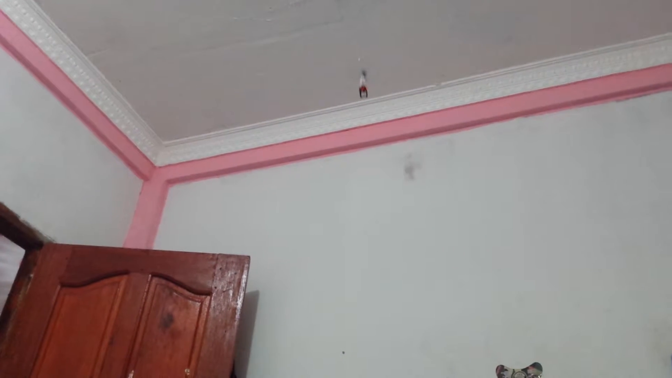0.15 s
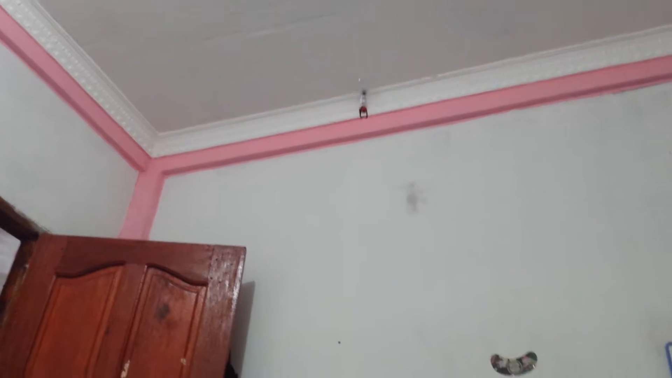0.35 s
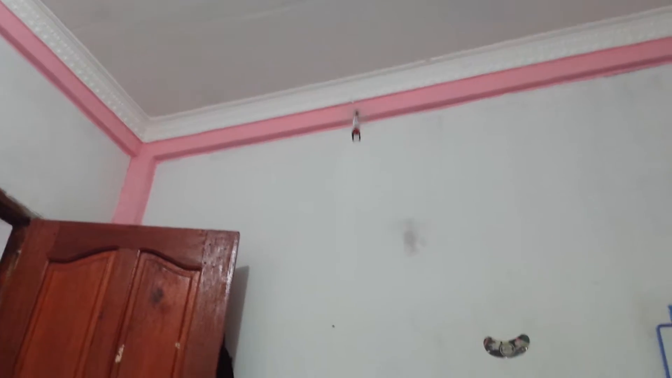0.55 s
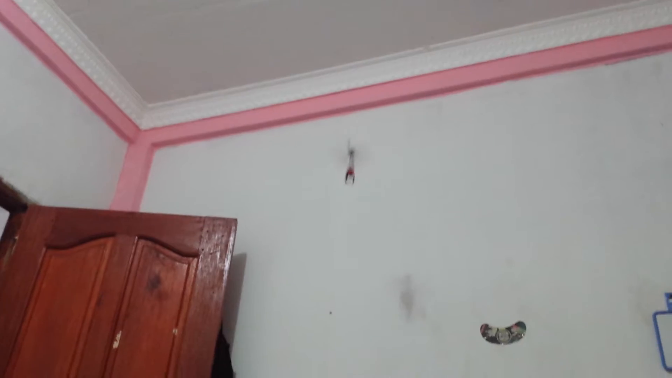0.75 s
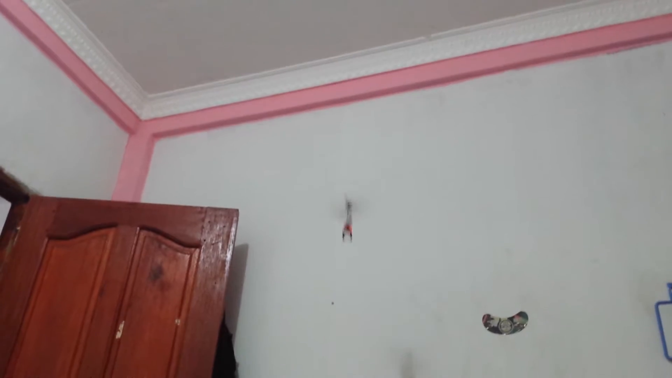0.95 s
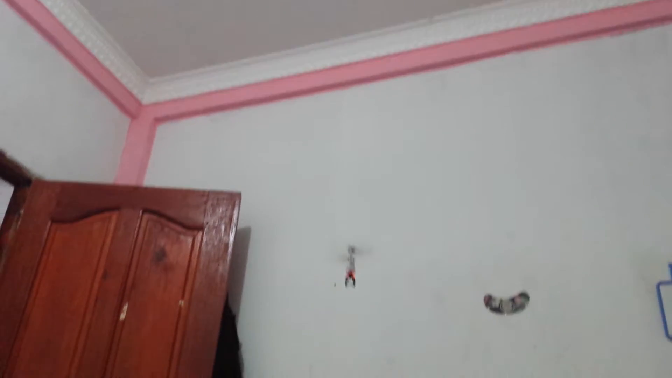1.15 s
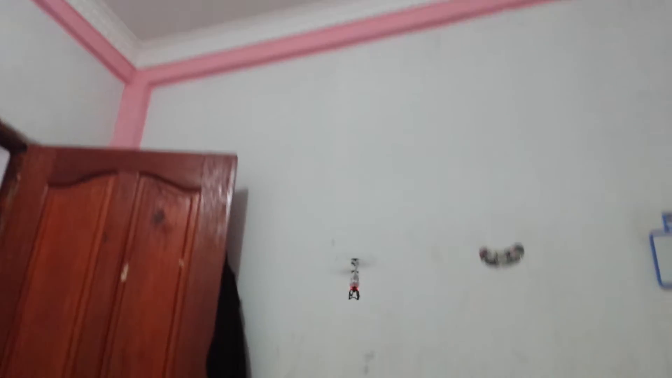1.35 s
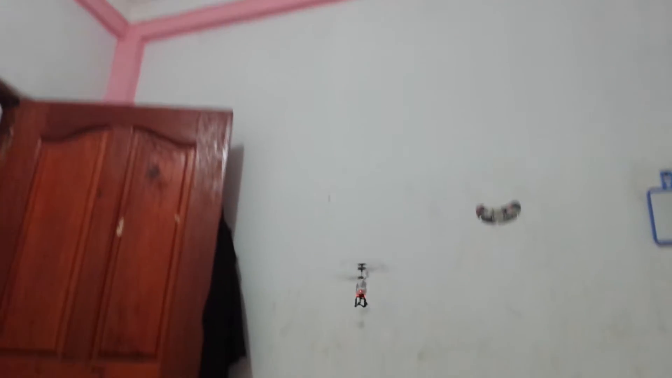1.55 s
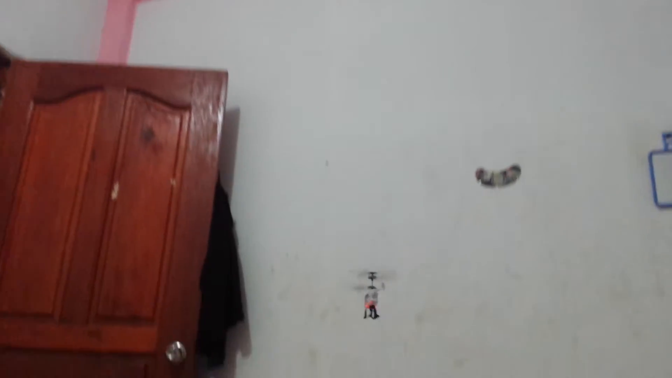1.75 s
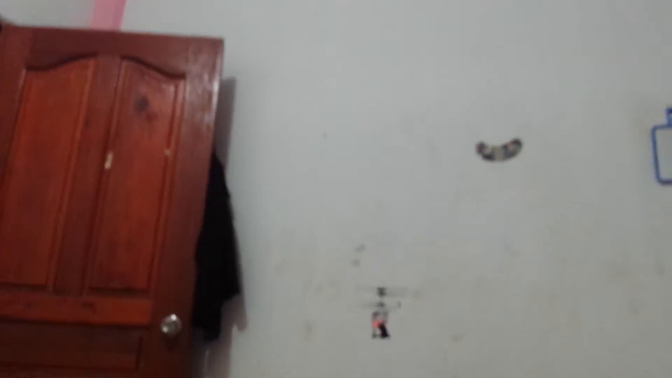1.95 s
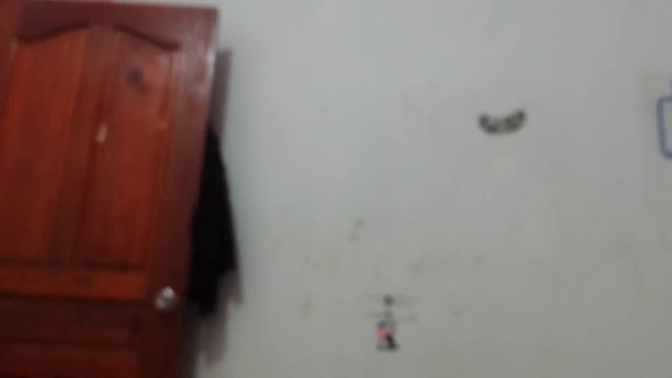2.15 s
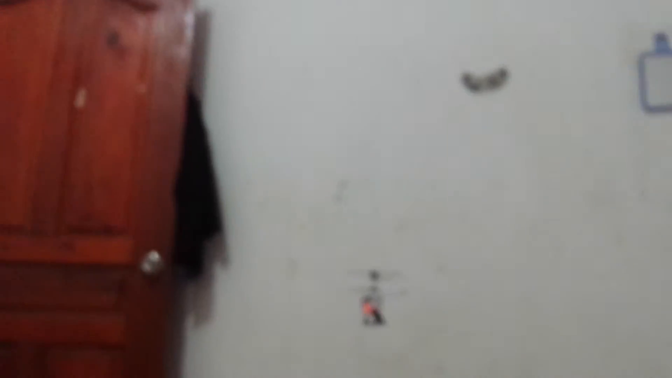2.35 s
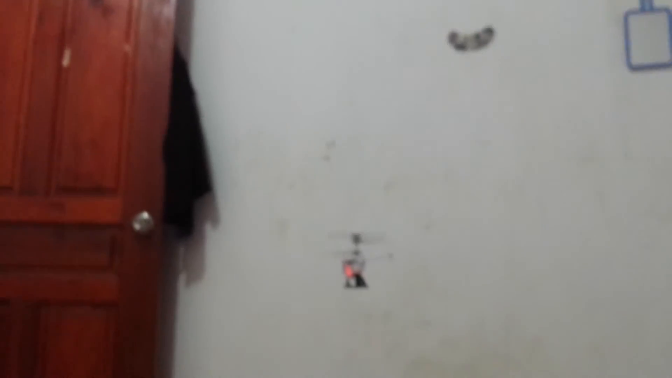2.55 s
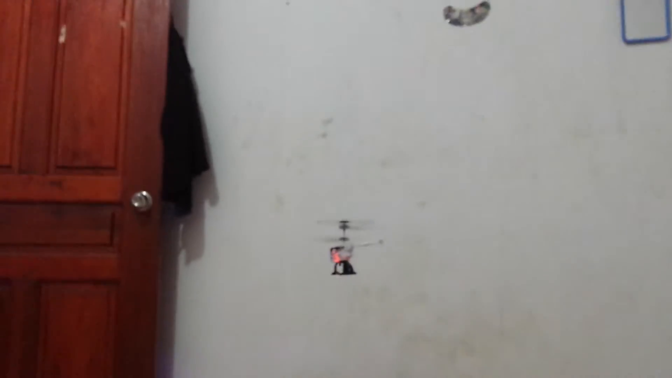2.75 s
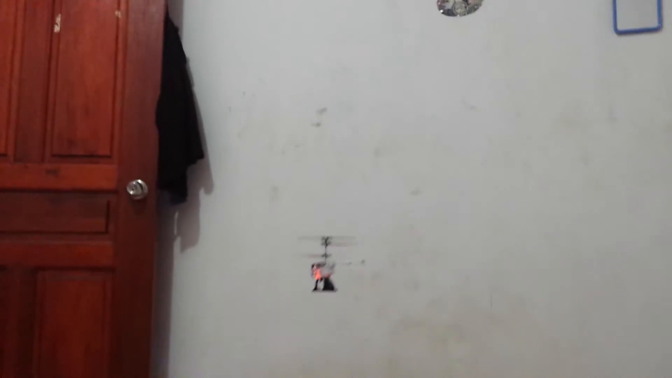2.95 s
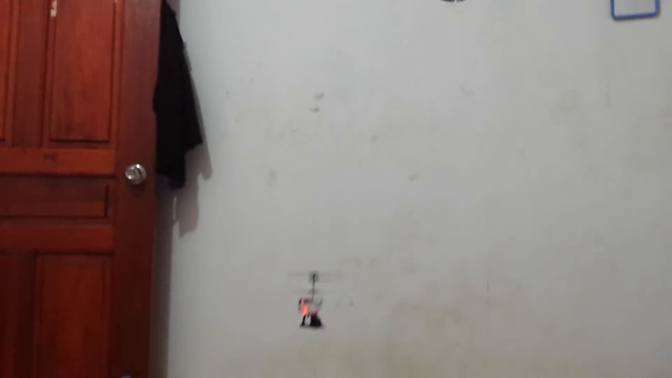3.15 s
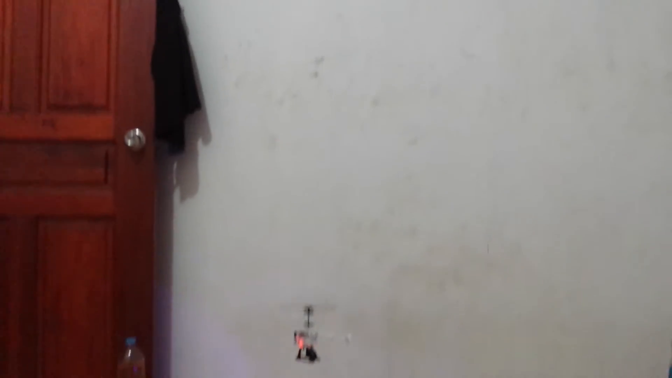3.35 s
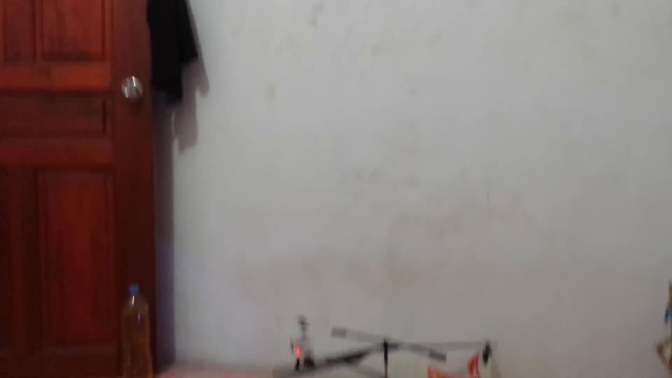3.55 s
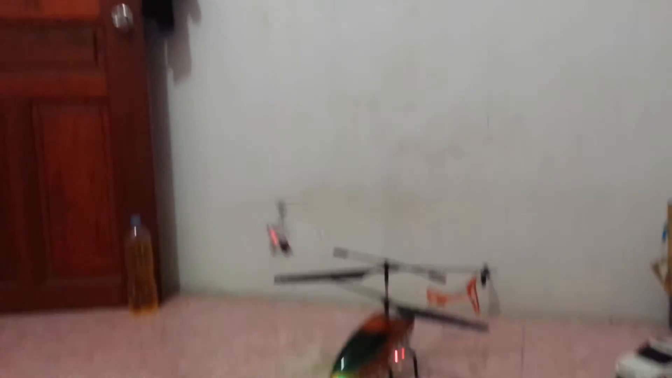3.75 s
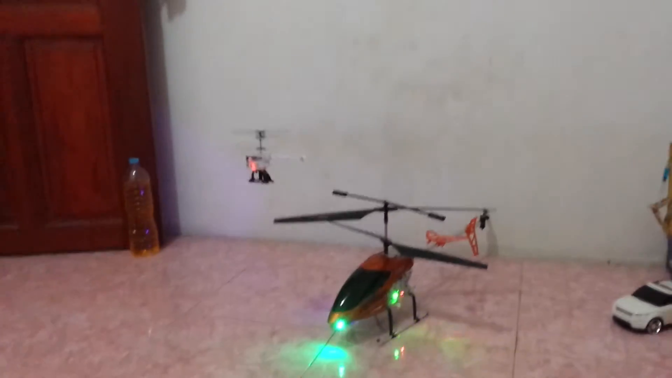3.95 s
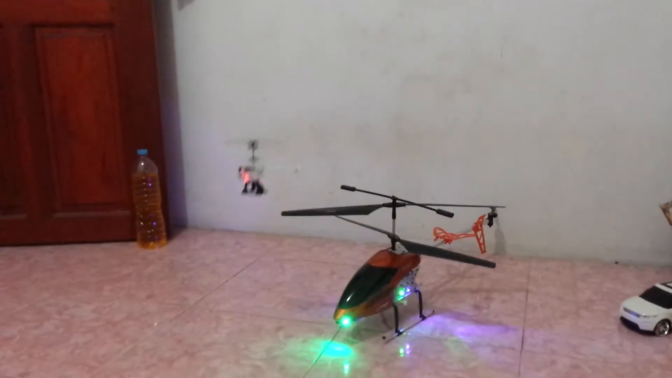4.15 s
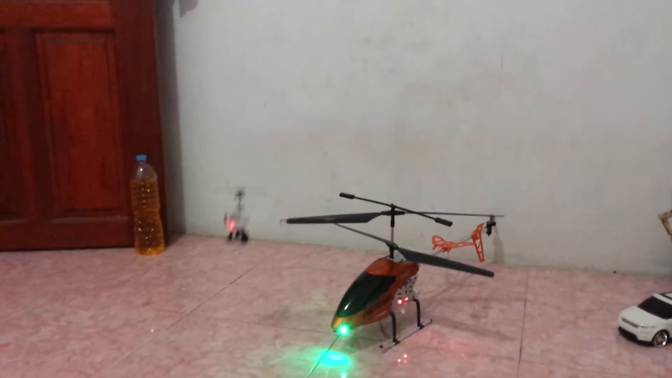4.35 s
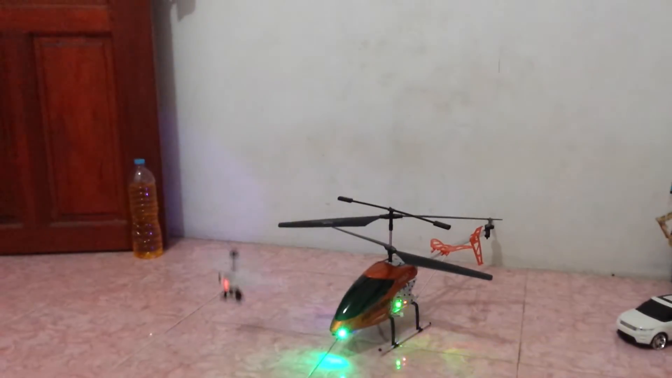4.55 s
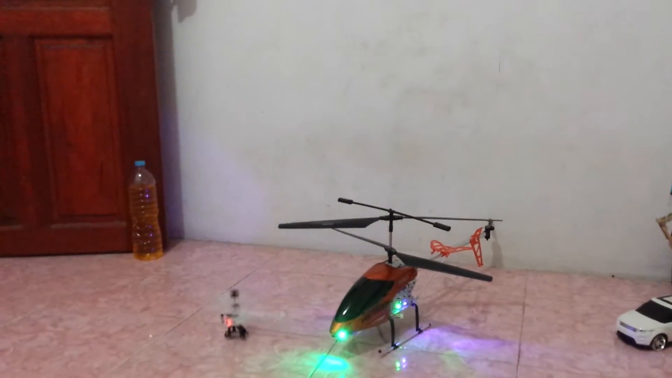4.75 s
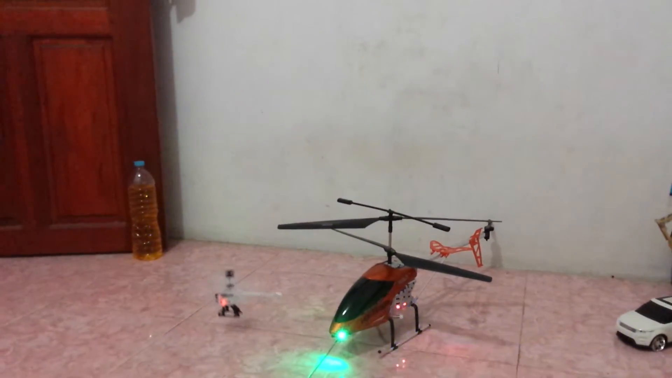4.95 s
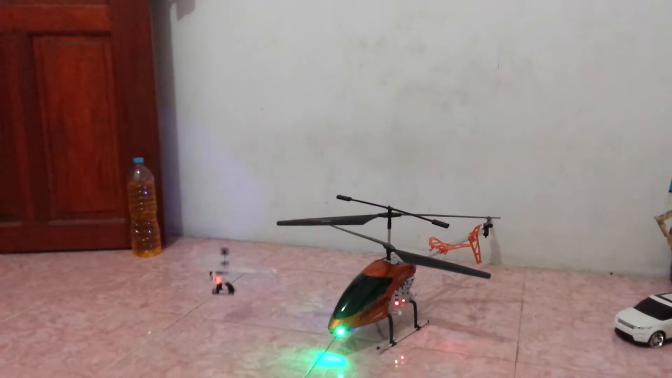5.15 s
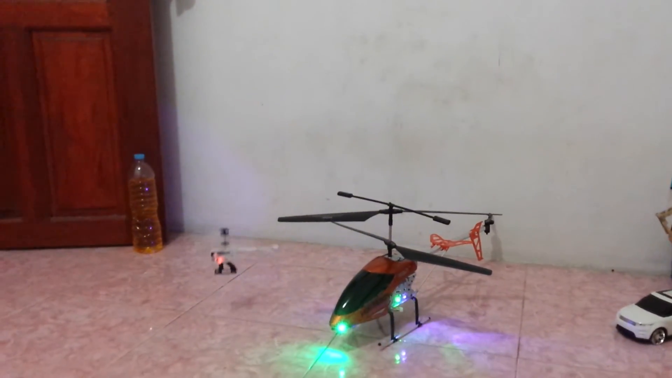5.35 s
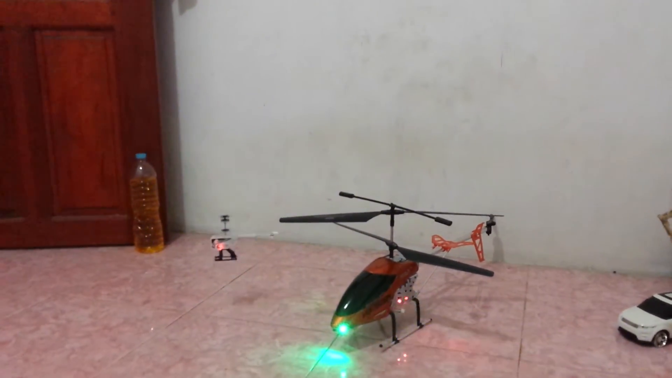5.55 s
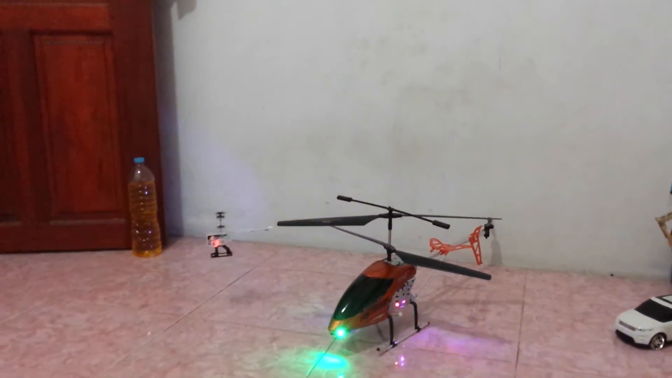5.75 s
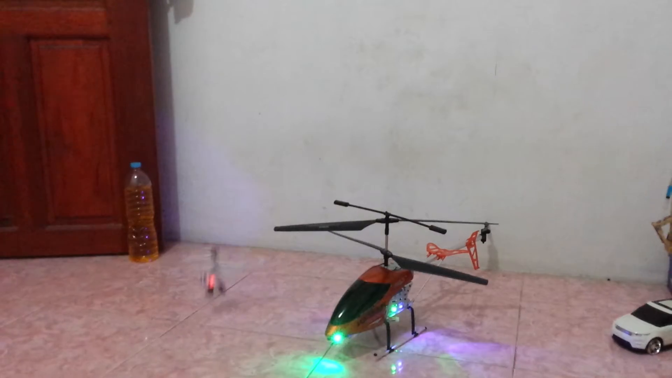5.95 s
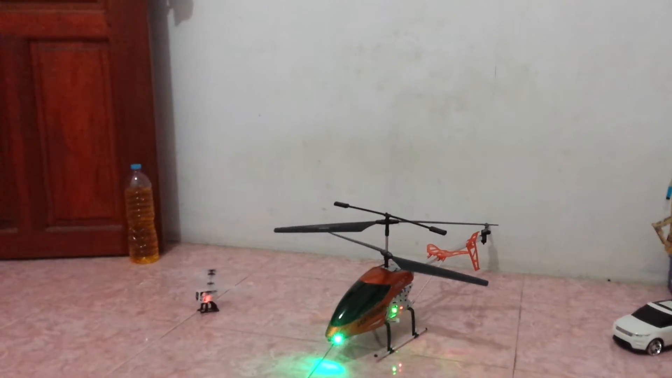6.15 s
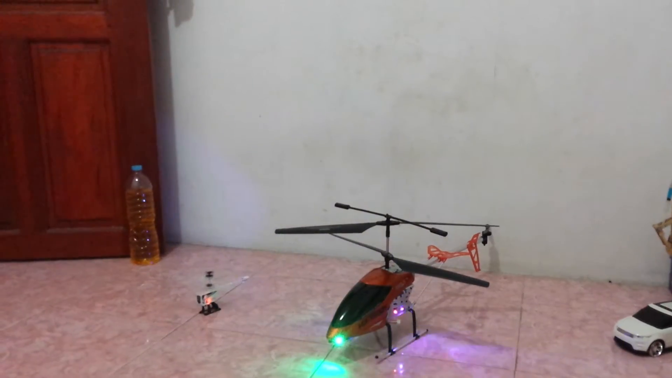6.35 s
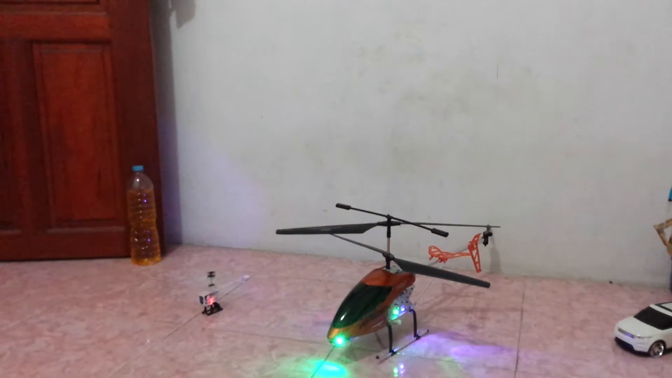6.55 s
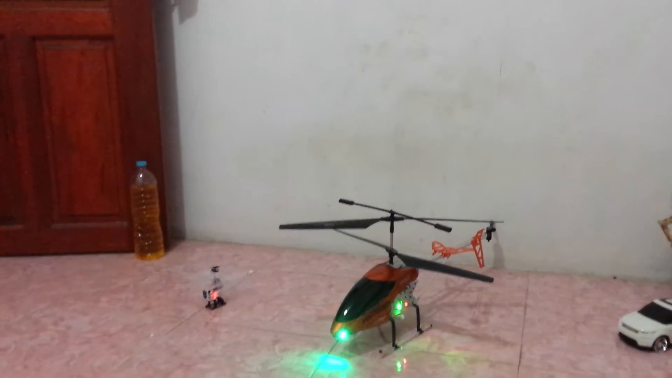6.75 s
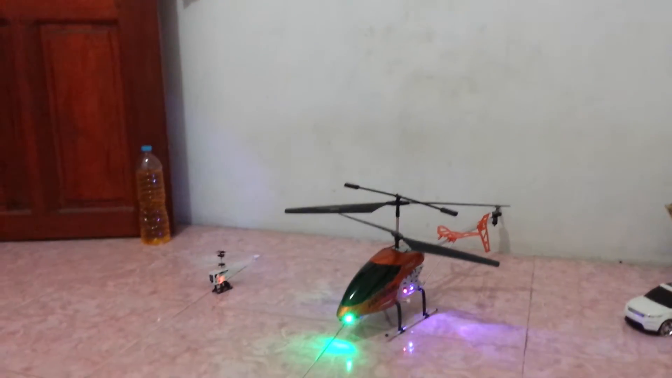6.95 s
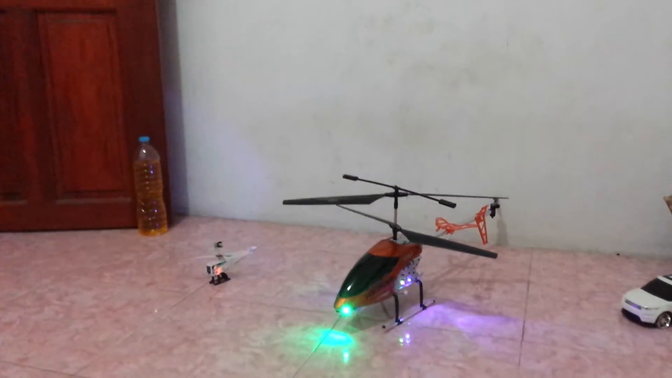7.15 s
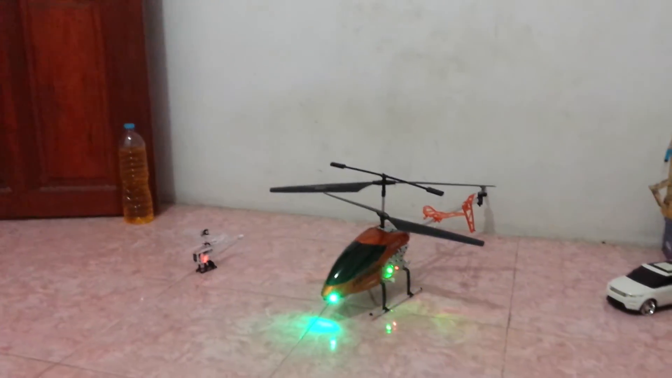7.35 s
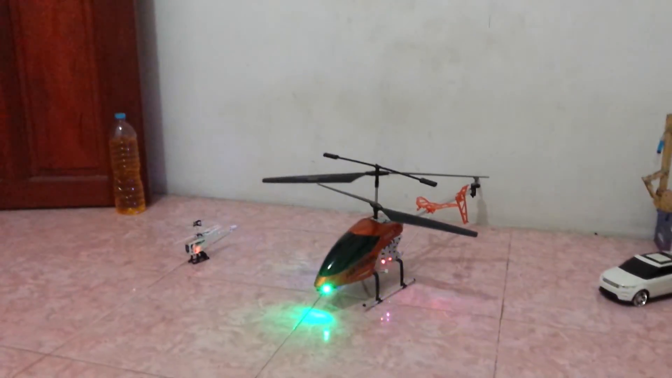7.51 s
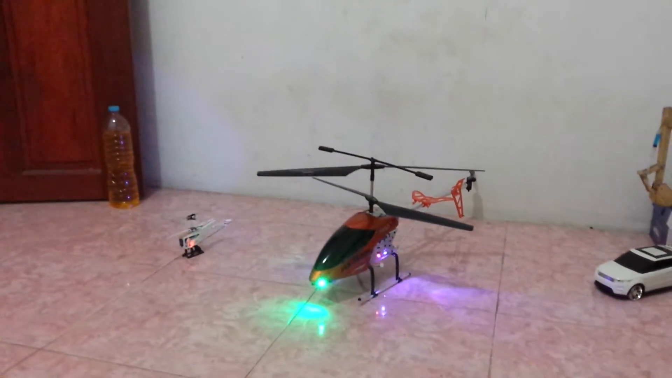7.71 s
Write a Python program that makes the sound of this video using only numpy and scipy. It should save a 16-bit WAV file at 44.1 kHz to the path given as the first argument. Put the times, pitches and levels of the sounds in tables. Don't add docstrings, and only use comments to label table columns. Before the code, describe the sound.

A tiny electric toy helicopter whines and hisses through a tiled room, chokes, cracks onto the floor, bounces, then its gears chatter down to quiet.

```python
import sys
import numpy as np
from scipy import signal
from scipy.fft import rfft, irfft, next_fast_len
from scipy.io import wavfile
from scipy.ndimage import uniform_filter1d, minimum_filter1d

SR = 44100
rng = np.random.default_rng(int(sys.argv[2]) if len(sys.argv) > 2 else 0)


def rack_gain(trim_db):
    fader = np.asarray(trim_db, float)
    return 10 ** (fader / 20)


def wrap_up_sound(samples):
    columns = np.atleast_2d(samples).T
    tamed = np.clip(columns, -1, 1)
    steps = np.round(tamed * 32767).astype(np.int16)
    wavfile.write(sys.argv[1], SR, steps)


N = 343083
TIME = np.arange(N) / SR


def curve(table):
    s, *columns = np.transpose(table)
    return [np.interp(TIME, s, column) for column in columns]


def unit(x):
    return x / np.sqrt(np.mean(x ** 2))


def colour(x, *tables):
    size = next_fast_len(N)
    log_hz = np.log(np.arange(size // 2 + 1) * SR / size + 1)
    db = 0
    for table in tables:
        hz, level_db = np.array(table).T
        db = db + np.interp(log_hz, np.log(hz), level_db)
    return irfft(rfft(x, size) * rack_gain(db), size)[..., :N]


def band(x, lo_hz, hi_hz):
    return signal.sosfilt(signal.butter(2, [lo_hz, hi_hz], "bandpass", fs=SR, output="sos"), x)


def noise():
    return rng.standard_normal((2, N))


def walk(rate):
    hold = int(SR / rate)
    steps = np.repeat(rng.standard_normal((2, N // hold + 1)), hold, axis=1)
    return 1.327 * uniform_filter1d(uniform_filter1d(steps, hold), hold)[:, :N]


def flares(rest_db, table):
    power = rack_gain(2 * rest_db)
    for s, db, length_s in table:
        power = power + rack_gain(2 * db) * np.exp(-((TIME - s) / length_s) ** 2)
    return 10 * np.log10(power)


def ring(hz, t60, t):
    return np.sin(2 * np.pi * hz * t) * np.exp(-np.log(1000) * t / t60)


# pitch in Hz, left minus right in dB.
PORTS = [(60, -0.5), (110, 3), (200, -7), (380, -16), (700, -4), (1290, -5), (2380, -6.5), (4400, 2.5),
         (8120, -12.5), (15000, -10.5)]


def ports(x):
    half = np.array(PORTS) * [1, .5]
    return np.array([colour(x[0], half), colour(x[1], half * [1, -1])])


# time in seconds, level in dB.
HOUSE = [(0, -50.5), (.5, -53.5), (1.9, -51.5), (2.12, -51), (2.5, -53), (3.5, -53.5), (4.1, -48),
         (5.27, -50), (5.7, -51.5), (6.15, -49), (6.35, -55), (6.8, -57), (7.1, -49.5), (7.78, -47)]
# pitch in Hz, level in dB per Hz.
HOUSE_TONE = [(12, -42), (20, -3), (91, -1), (136, -6), (235, 2), (318, 1), (517, -7.5), (596, -4),
              (1390, -12.5), (1670, -13), (1850, -7), (2170, -5), (2500, -7), (3250, -4.5), (5500, -120)]
# time in seconds, level against the house in dB, length in seconds.
RUMBLES = [(.55, -15, .11), (1.49, -2, 0.25), (2.7, -1, .17), (3.2, 1, .25), (5.5, -5, .27), (6.5, -4, .21),
           (7.097, -11, .31)]
# time in seconds, level in dB, length in seconds.
DRONE = [(0.983, -53.5, 0.082), (2.0, -60, 0.076), (2.275, -51, 0.068), (3.15, -54, 0.31),
         (3.62, -51, 0.17), (4.203, -44.5, 0.34), (4.595, -47, .15), (5.35, -54, 0.17), (6.15, -51, 0.2),
         (7.0, -53.5, 0.27), (7.45, -51.5, 0.21), (7.78, -49, 0.11)]
# level in dB of the 1st, 2nd, 3rd .. multiple of its pitch.
DRONE_DB = [-30, -18, 0.5, -41, -33, -16.5, -11.5, -16.5, -13.5, -12.5]
# start in seconds, end in seconds, pitch in Hz, level in dB.
HUM = [(.4, 2.3, 316.8, -54), (0, 1.3, 633.6, -60), (7.1, 8, 316.8, -54), (2.5, 3.6, 55, -56),
       (3.9, 8, 62.3, -57), (0, 1.2, 62, -62), (1.9, 2.45, 175, -53), (3.05, 3.4, 172, -55),
       (1.9, 3.1, 137, -60), (6.2, 7.5, 44, -64), (6.6, 8, 175.8, -52), (7.3, 8, 177, -46),
       (6.0, 8, 219.6, -60), (6.0, 8, 263, -56), (6.8, 7.6, 362, -51), (6.9, 7.7, 571, -57),
       (7.0, 8, 947, -61), (6.9, 8, 1010, -62), (6.9, 8, 1890, -56), (6.0, 8, 134, -55),
       (5.6, 6.6, 295, -56), (4.9, 5.5, 62.3, -62)]
# time in seconds, pitch in Hz, peak in dB, time to die by 60 dB in seconds.
KNOCKS = [
    (7.38, 505, -26.5, 0.098),
    (2.05, 966, -38, 0.37),
    (5.3, 130, -43, .1),
]


def house():
    drone_hz = 48.5
    db = curve(HOUSE)[0] + 2.1 * walk(6)[0]
    bass_db = 3 + 1.4 * walk(5)[0]
    sub_db = flares(-3, RUMBLES)
    drone_db = flares(-68, DRONE)
    mid, side = noise()
    apart = colour(side, [(30, -12), (130, -14), (250, -11.5), (500, -10), (1000, 0.6)])
    air = colour(mid + apart * np.array([[1], [-1]]), HOUSE_TONE)
    out = rack_gain(db + 5.5) * unit(band(air, 240, 2320))
    out += rack_gain(db + bass_db - 3) * unit(band(air, 85, 200))
    out += rack_gain(db + sub_db - 10) * unit(band(air, 25, 80))
    for k, part_db in enumerate(DRONE_DB):
        level = rack_gain(drone_db + part_db + 1.5 + 3.0 * walk(9)[0])
        out += level * np.sin(2 * np.pi * (k + 1) * drone_hz * TIME)
    for start, end, hz, hum_db in HUM:
        swell = np.clip(np.minimum(TIME - start + 0.035, end - TIME) / 0.14, 0, 1)
        out += swell * rack_gain(hum_db + 1.0 * walk(9)[0]) * np.sin(2 * np.pi * hz * TIME)
    for s, hz, peak_db, t60 in KNOCKS:
        t = np.maximum(TIME - s, 0)
        out += rack_gain(peak_db) * ring(hz, t60, t) * (1 - np.exp(-t / 0.0039))
    return out


def speed(motor):
    return curve(motor)[0] * np.exp(-np.maximum(TIME - 6.05, 0) / 2.8)


def turns(motor, wobble):
    return 2 * np.pi * np.cumsum(speed(motor) * (1 + wobble * walk(40)[0])) / SR


TEETH = 7
CHOP_HZ = 316.8
GEAR = 10
# pitch in Hz, level in dB per Hz.
RATTLE = [(650, -29.5), (1100, -30.5), (1540, -28.5), (1760, -18.5), (2950, -7), (4220, -9.5), (5520, -2),
          (7100, 1), (7800, 2), (8700, -5.5), (10200, -13), (12900, -20), (14500, -20), (15500, -27),
          (16000, -84)]
# pitch in Hz, level in dB.
THIN_BASS = [(150, -25), (700, 0)]


def rattle(angle_a, angle_b):
    hiss = noise()
    for angle in (angle_a, angle_b):
        hiss += rack_gain(-16) * unit(band(noise(), 12, 770)) * np.cos(TEETH * angle + 1)
        hiss += rack_gain(-10.5) * unit(band(noise(), 12.0, 600)) * np.cos(2 * TEETH * angle)
        hiss += rack_gain(-14.5) * unit(band(noise(), 22, 275)) * np.cos(3 * TEETH * angle)
    beat = 1 + .05 * np.cos(2 * np.pi * CHOP_HZ * TIME)
    beat = beat + .08 * np.cos(angle_a / GEAR) + .05 * np.cos(angle_b)
    return unit(colour(hiss * beat, RATTLE, THIN_BASS))


def tones(angle, table, db, fade_db):
    chop = 2 * np.pi * CHOP_HZ * TIME
    out = np.zeros((2, N))
    for order, side, tone_db in table:
        start = rng.uniform(0, 2 * np.pi) + 0.6 * np.array([[1], [-1]])
        fade = fade_db * (1 if side == 0 else 1.4) * walk(12)
        beads = walk(55)
        wave = np.sin(order * angle + side * chop + start + .3 * beads[::-1])
        out += rack_gain(tone_db + fade) * (1 + .55 * beads) * wave
    return np.sqrt(2) * rack_gain(db) * out * (1 + 0.086 * np.cos(angle / GEAR + start))


# level in dB of the 1st, 2nd, 3rd .. multiple of the crossing rate.
BLADES_DB = [-60.5, -60, -63, -70]


def blades(angle_a, angle_b):
    cross = 2 * (angle_a + angle_b) / GEAR
    out = np.zeros((2, N))
    for k, db in enumerate(BLADES_DB):
        out += rack_gain(db + 7.4 * walk(3)) * np.sin((k + 1) * cross)
    return out * np.clip((6.0 - TIME) / 0.14, 0, 1)


# time in seconds, shaft speed in Hz.
MOTOR_A = [(0, 385.9), (.3, 385.5), (.55, 381), (.81, 382), (1.06, 409.5), (1.2, 414), (1.36, 414.5),
           (2.07, 406.3), (2.3, 416.5), (2.46, 416.5), (2.88, 384), (3.1, 376.2), (3.6, 368.5),
           (3.9, 370.8), (4.52, 366), (4.82, 381.8), (5.33, 388.3), (5.85, 382.5)]
MOTOR_B = [(0, 371), (.71, 373.8), (1.06, 412.2), (1.33, 415), (1.55, 422.3), (2.05, 432), (2.25, 443.6),
           (2.43, 445.5), (2.57, 433.5), (2.87, 388.5), (3.1, 379.8), (3.75, 379.8), (3.95, 388),
           (4.45, 391.8), (4.82, 418.5), (5.15, 425.8), (5.6, 426.9), (5.85, 421)]
# time in seconds, level in dB, left minus right in dB measured from its
FLIGHT = [(0, -22, -4), (.3, -23, -5), (.9, -21.5, -3), (1.7, -20.5, -3), (1.95, -23, -5.5),
          (2.1, -18.5, -4.5), (2.4, -26.5, -6.5), (2.55, -23, -4), (3.0, -22, -6.5), (3.65, -23.5, -7),
          (3.8, -21, -6), (4.1, -20, -6), (4.6, -21, -4), (5.05, -22, -4), (5.7, -22, -4),
          (6.0, -21.5, -2.5), (6.15, -26, -0.5), (6.45, -44, -6)]
# multiple of the shaft speed, multiple of the chopping rate added, level in dB.
TONES_A = [(5, -1, -30), (7, -1, -15), (7, 0, 1), (7, 1, -13), (8, 0, -15), (8, 1, -16), (14, 0, -2),
           (14, 1, -7), (14, -1, -11), (21, 0, -12), (21, 1, -14), (21, -1, -11)]
TONES_B = [(1, 0, -33), (4, 0, -23), (5, 0, -15), (6, -1, -15), (6, 0, -10), (7, -2, -14), (7, -1, -9),
           (7, 0, 0), (7, 1, -1), (7, 2, -11), (14, 0, -1), (14, 1, -3), (14, 2, -6), (14, -1, -7)]
# time in seconds, level in dB, length in seconds.
FLARES_A = [(0, -24, 0.039), (0.207, -23, 0.075), (.38, -23.5, 0.062), (0.716, -27.5, 0.062),
            (0.984, -26, 0.075), (1.176, -28.5, 0.037), (1.505, -31.5, .12), (1.892, -24, 0.092),
            (2.103, -23, 0.036), (2.386, -25.5, 0.18), (2.673, -29, 0.15), (2.955, -26, 0.067),
            (3.29, -29.5, 0.11), (3.496, -30, .06), (3.69, -30, 0.078), (4.087, -23, 0.087),
            (4.48, -23.5, 0.084), (4.696, -28, 0.12), (4.893, -25, 0.076), (5.08, -22, 0.04),
            (5.312, -28, 0.035), (5.513, -21.5, 0.043), (5.68, -27, 0.09)]
FLARES_B = [(.15, -34, 0.15), (0.494, -36, 0.088), (.8, -34, .06), (1.0, -31, 0.11), (1.193, -30.5, 0.066),
            (1.574, -30, 0.23), (2.02, -29, 0.11), (2.31, -31.5, 0.058), (3.884, -34, 0.12),
            (4.103, -25, 0.043), (4.31, -31, 0.044), (4.65, -32.5, 0.27), (5.17, -31.5, 0.14),
            (5.336, -27.5, .08), (5.516, -27.5, 0.11), (5.803, -30.5, 0.056)]


def helicopter():
    db, pan_db = curve(FLIGHT)
    dip_db = -2.5 * np.exp(-((TIME - 6.115) / .011) ** 2)
    db = db + 0.74 * walk(9)[0] + dip_db
    shut = np.maximum(TIME - 5.8, 0) / 0.09
    extra_hz = (curve(MOTOR_A)[0] + curve(MOTOR_B)[0]) / 2 - 395
    low_db = -5 - 0.02 * extra_hz
    top_db = -2 + 0.0362 * extra_hz - 5.5 * np.minimum(shut / 2, 1) + 0.75 * walk(8)

    angle_a = turns(MOTOR_A, 0.001205)
    angle_b = turns(MOTOR_B, 0.00147)
    gears = ports(rattle(angle_a, angle_b))
    low = signal.sosfiltfilt(signal.butter(4, 4200, fs=SR, output="sos"), gears)
    body = signal.sosfiltfilt(signal.butter(4, 7200, fs=SR, output="sos"), gears)
    pan = rack_gain(np.array([1, -1])[:, None] * (pan_db - pan_db.mean()) / 2)
    high = unit(body - low) + rack_gain(top_db + 0.5) * unit(gears - body)
    low = rack_gain(low_db - 1.0 + 0.59 * walk(7)) * unit(low)
    stop = np.clip((6.6 - TIME) / .2, 0, 1)
    flight_rattle = rack_gain(db + 1.5) * stop * (high * pan + low)

    a_db = flares(-37, FLARES_A) - 20 * shut
    b_db = flares(-36.5, FLARES_B) - 20 * shut
    song = tones(angle_a, TONES_A, a_db, .9) + tones(angle_b, TONES_B, b_db, 2.4)
    return flight_rattle + rack_gain(-1.5) * ports(song) + blades(angle_a, angle_b)


def room(x):
    t60_s, echo_db = 0.64, -3.5
    t = TIME[:SR]
    tail = rng.standard_normal((2, SR)) * np.exp(-np.log(1000) * t / t60_s) * (1 - np.exp(-t / 0.01))
    tail /= np.sqrt(np.sum(tail ** 2, axis=1, keepdims=True))
    return x + rack_gain(echo_db) * signal.fftconvolve(x, tail, axes=1)[:, :N]


# time in seconds, peak in dB.
LANDING = [
    (6.1211, 6),
    (6.146, -16),
    (6.161, -18),
    (6.18, -27),
    (6.2, -11),
]
# pitch in Hz, level in dB, time to die by 60 dB in seconds.
SKID = [(2460, -3, 0.012), (1150, -16, .02), (2870, -10, 0.01), (7400, 4.5, .003), (9300, 0, 0.0046)]


def landing():
    out, t = np.zeros((2, N)), TIME[:SR // 4]
    for s, db in LANDING:
        detune = 1 + 0.025 * rng.standard_normal(len(SKID))
        blow = 1.67 * rng.standard_normal((2, len(t))) * np.exp(-t / 0.0048)
        for (hz, level_db, t60), shift in zip(SKID, detune):
            blow += rack_gain(level_db) * ring(hz * shift, t60, t)
        first = int(s * SR)
        out[:, first:first + len(t)] += rack_gain(db - 9.5) * blow
    plastic = [(150, -20), (900, -13.0), (2500, 3), (4300, -6), (7500, 3), (10000, -4.5), (16000, -17)]
    return (TIME > LANDING[0][0] - .0004) * room(ports(colour(out, plastic)))


# time in seconds, level in dB.
COAST = [(6.25, -21), (6.4, -35), (6.77, -38), (7.04, -39.5), (7.07, -36.5), (7.22, -39.5), (7.37, -41),
         (7.78, -46.5)]
# pitch in Hz, level in dB per Hz.
COAST_TONE = [(760, -44), (1300, -27), (1760, -18), (1860, -18), (2020, -9.5), (3010, -11), (4930, -14.5),
              (6220, 1), (7130, -11), (11300, -23), (12800, -33), (14900, -31), (16000, -36)]


def coasting():
    ticks = rack_gain(0.63 * walk(500) + 0.42 * walk(40)[0])
    start = np.clip((TIME - 6.2) / 0.26, 0, 1)
    chatter = unit(ports(colour(noise() * ticks, COAST_TONE, THIN_BASS)))
    return rack_gain(curve(COAST)[0] + 6.5) * start * chatter


def scene():
    return house() + helicopter() + landing() + coasting()


def roll_off(x):
    return signal.sosfilt(signal.butter(12, 15760, fs=SR, output="sos"), x)


def record(dry):
    reach = int(0.012 * SR)
    need = np.minimum(1, .9 / (np.abs(dry).max(axis=0) + 1e-9))
    gain = uniform_filter1d(minimum_filter1d(need, 2 * reach), 2 * reach)
    return roll_off(dry * gain)


dry = scene()
out = record(dry)
wrap_up_sound(out)
```